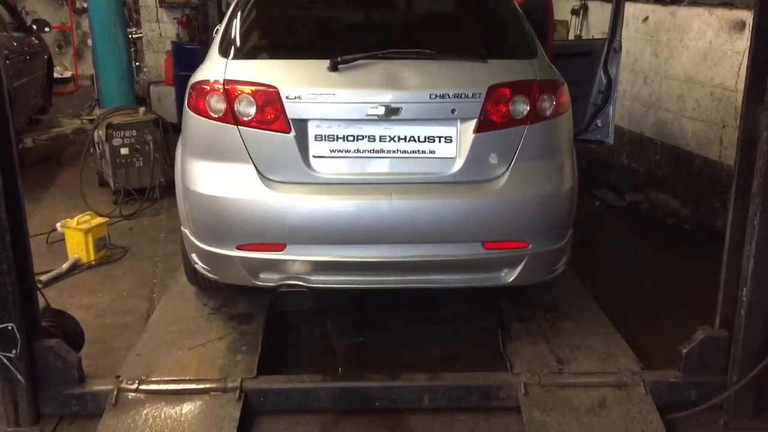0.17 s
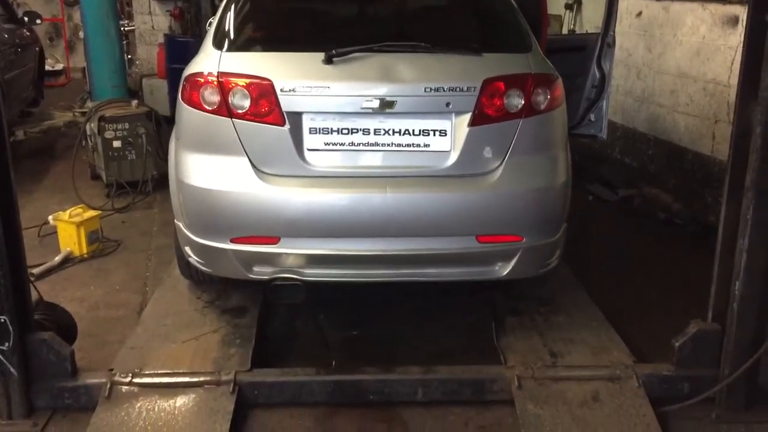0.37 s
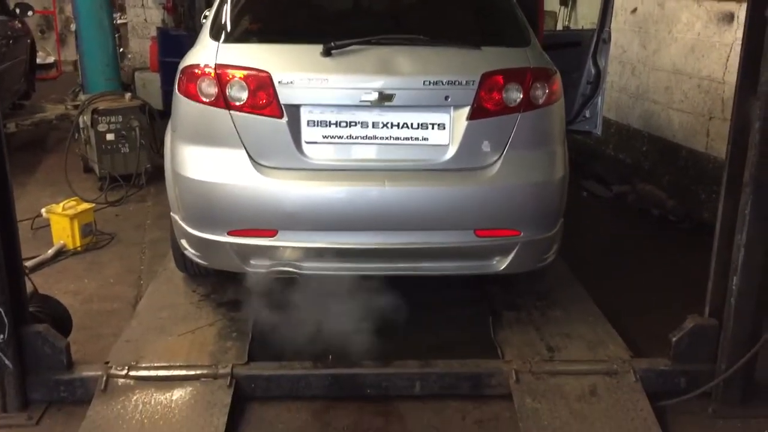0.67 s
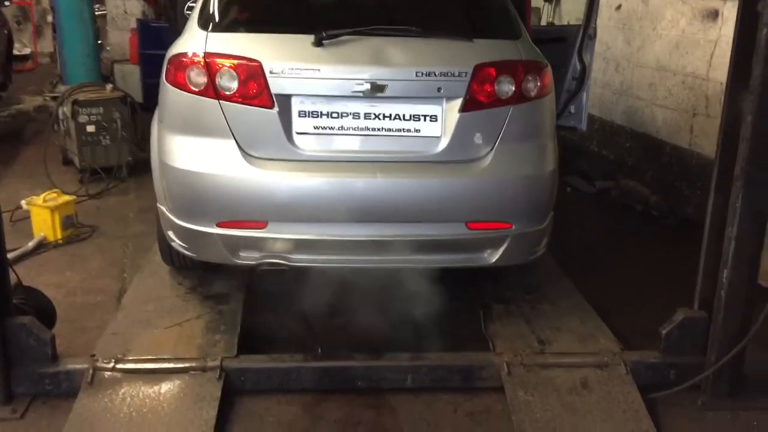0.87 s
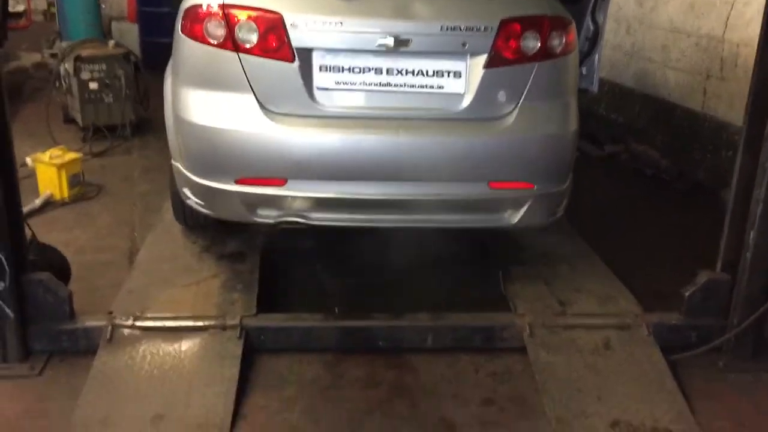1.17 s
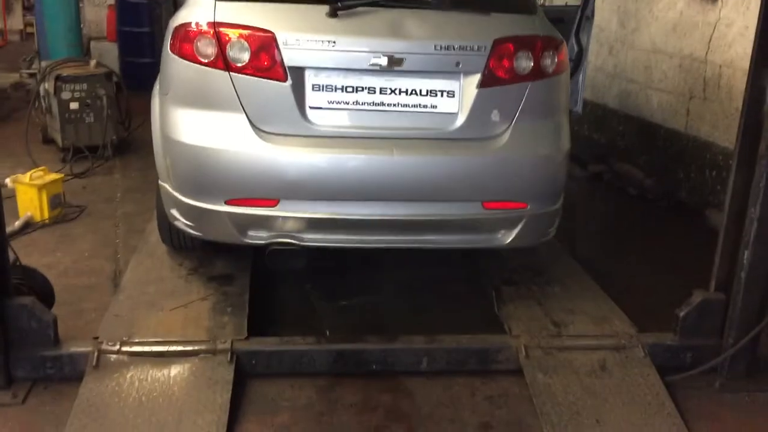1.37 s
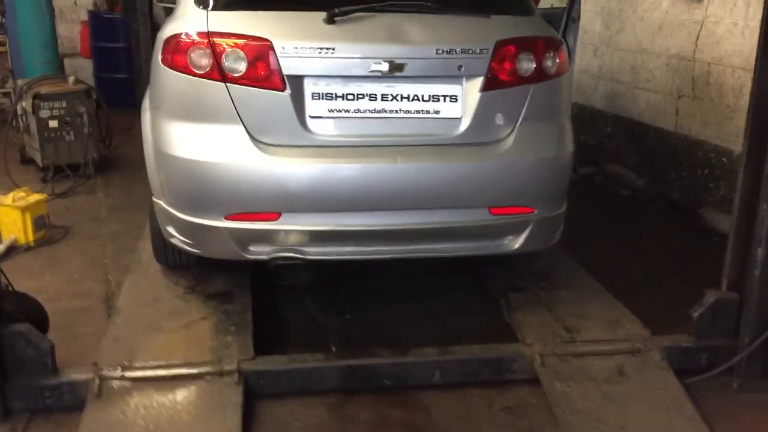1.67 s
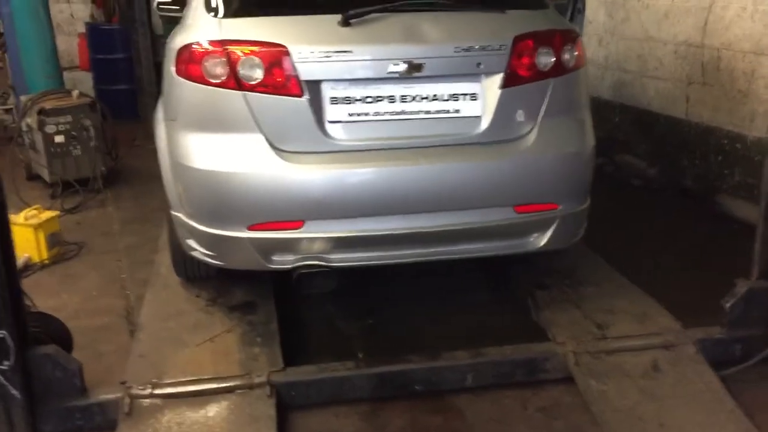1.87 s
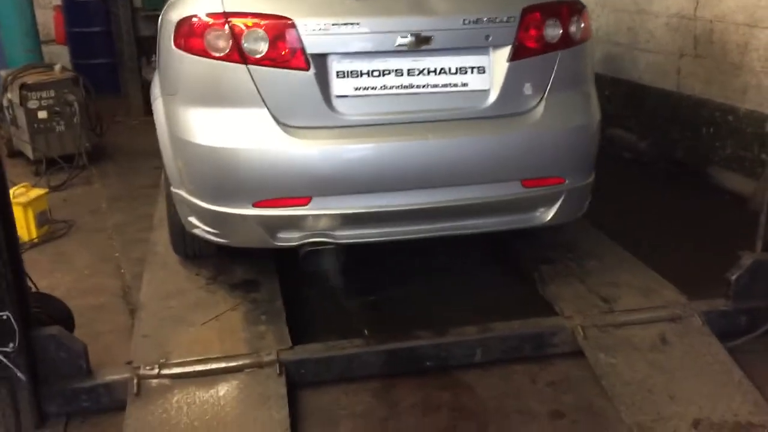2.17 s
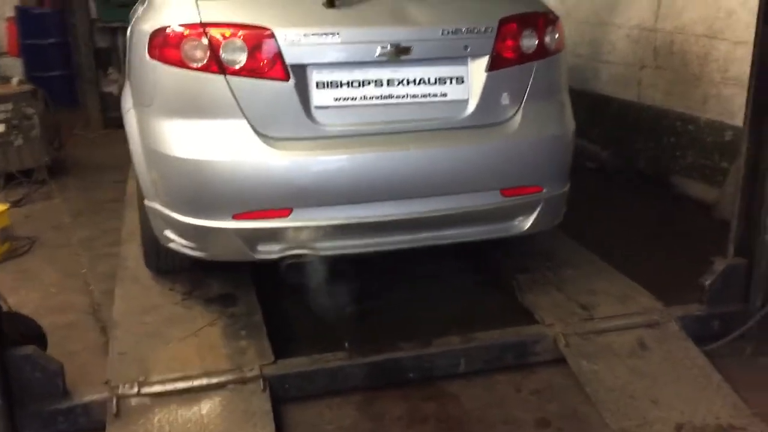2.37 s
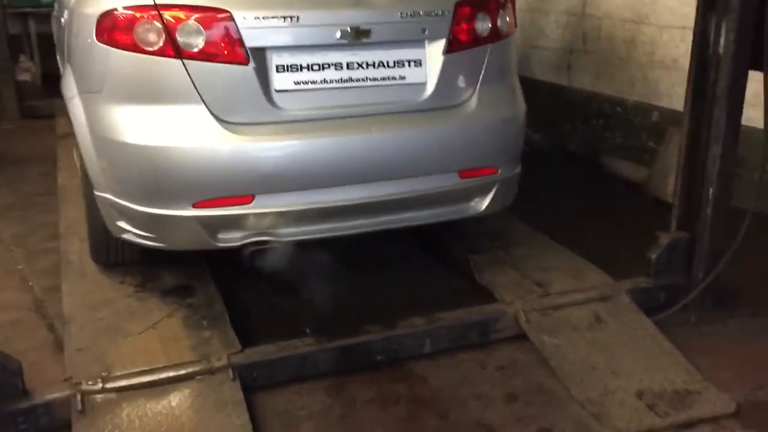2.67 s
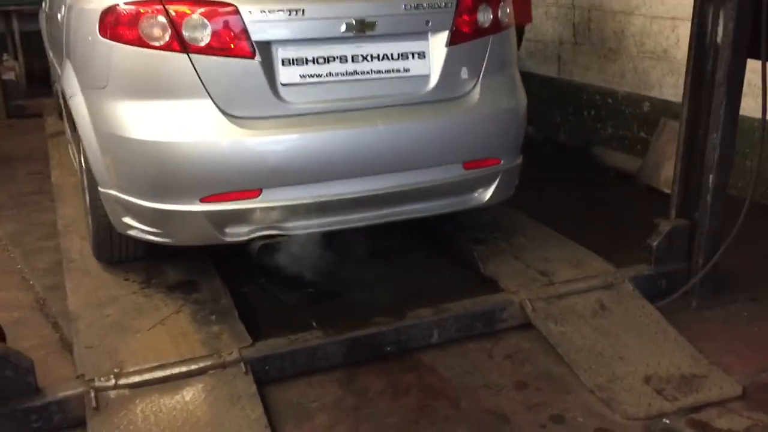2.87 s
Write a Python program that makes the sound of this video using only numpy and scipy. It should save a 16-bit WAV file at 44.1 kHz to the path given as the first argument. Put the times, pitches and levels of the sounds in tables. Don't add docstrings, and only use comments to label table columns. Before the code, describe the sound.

A four-cylinder car exhaust, heard close behind the tailpipe in a workshop, starts as a humming drone sliding down and wavering in loudness. Around 0.6 s a short throttle blip rasps with a gassy roar; a longer, stronger one follows at 1.1-1.4 s, raising the pitch. At 1.42 s one abrupt pop marks a cut, then the drone sinks steadily, duller and deeper, until 3 s. Short room echo.

```python
import sys
import numpy as np
from scipy import signal
from scipy.fft import rfft, irfft, next_fast_len
from scipy.io import wavfile
from scipy.ndimage import uniform_filter1d, map_coordinates

SR = 44100
rng = np.random.default_rng(int(sys.argv[2]) if len(sys.argv) > 2 else 0)


def invert_db(level):
    return 10 ** (np.asarray(level, dtype=float) / 20)


def waveform_to_disk(signal):
    frames = np.transpose(np.atleast_2d(signal))
    scaled = np.clip(frames, -1, 1) * 32767
    samples = np.round(scaled).astype(np.int16)
    wavfile.write(sys.argv[1], SR, samples)


N = 133182


def unit(x):
    return x / np.sqrt(np.mean(x ** 2) + 1e-20)


def along(points, hz):
    f, value = np.transpose(points)
    return np.interp(np.log(hz + 1), np.log(f + 1), value)


def curve(rows):
    t, value = np.transpose(rows)
    straight = np.interp(np.arange(N) / SR, t, value)
    return uniform_filter1d(straight, size=900, mode="nearest")


def wobble(rate):
    knots = rng.standard_normal(int(N * rate / SR) + 4)
    return map_coordinates(knots, [np.arange(N) * rate / SR])


def filtered(x, response):
    m = next_fast_len(len(x) + SR // 2)
    return irfft(rfft(x, m) * response(np.fft.rfftfreq(m, 1 / SR)), m)[:len(x)]


def ring(modes, f):
    return sum(sign * invert_db(db) * 1j * f * width / (center * center - f * f + 1j * f * width)
               for center, width, db, sign in modes)


def dip(hz, width, f):
    return ring([(hz, width, 0, 1)], f)


def noise(spectrum):
    return unit(filtered(rng.standard_normal(N), lambda hz: invert_db(along(spectrum, hz))))


# t/s, firing rate f/Hz
SPEED = [(0, 179.6), (.19, 169.2), (.38, 159.3), (.51, 154.7), (.56, 155.8), (.66, 161.7), (.8, 164.2),
         (.9, 162.9), (1.07, 157.3), (1.13, 160), (1.25, 174.1), (1.31, 179), (1.4, 180.1), (1.45, 179.9),
         (1.73, 165.7), (2.09, 146.8), (2.49, 128.6), (3.02, 105.3)]


def firing_rate():
    return curve(SPEED)


# t/s, load [0-1]
BLIPS = [
    [(.535, 0), (.57, 0.11), (.622, 1), (.66, 0.77), (.705, 0.45), (.78, 0)],
    [(1.075, 0.06), (1.105, 0.16), (1.155, 1), (1.25, 0.84), (1.33, 0.3), (1.41, 0.01)],
]


def throttle_load():
    return sum(curve(blip) for blip in BLIPS)


# multiple, coasting level/dB, added under load level/dB
WHOLE = [(1, -11, 0), (2, -11, -13), (3, -17, 18), (4, -18.5, 16.5), (5, -25.5, 19.5), (6, -18, -7)]
# multiple, coasting level/dB, added under load level/dB
HALF = [(0.51, -37, 8), (.75, -52, 3), (1.25, -36.5, 1.5), (1.75, -42, 3.5), (1.5, -17.5, 0),
        (2.5, -26.5, 17), (2.6, -54.5, 9), (4.5, -31.5, 2.2), (5.5, -30, 18)]
# multiple, coasting level/dB, added under load level/dB
WHINE = [(6.5, -39, 3), (7, -32, 3), (7.5, -31, -6), (8, -44, 9), (8.5, -46, 3)]
# f/Hz, width f/Hz, level/dB, sign and size [1]
PIPE = [(105.2, 15, -16, 0.65), (115, 27, -33, -1.16), (135.8, 10, -7, -0.79), (145.2, 4.72, 3, -1.28),
        (163.4, 12.35, 2.65, 1), (182.4, 20.9, -1, -1.104), (219.04, 9.85, 4.5, 0.8),
        (254.33, 13.5, -7, -0.96), (314.5, 5.04, -1, 0.97), (377.8, 12.9, -13.5, -1.1),
        (450.5, 9.4, -14, 0.93), (622.3, 17.2, -10, -0.89), (675.2, 17, -9, 0.42), (783, 26.4, -7.5, -0.64)]
# f/Hz, width f/Hz, level/dB, sign and size [1]
BRANCH = [(86, 120, -1, 0.49), (150, 39, -13, -1.7), (201.3, 14, 3.5, -0.61), (221, 14, -12.5, 1),
          (259, 18.4, -2.5, 0.91), (320, 5.7, 1, -1.41), (388, 10, -24.5, 0.9), (604, 23.3, -7.5, -1.66),
          (697, 67, -5.5, 1), (846, 150, 4, 0.023)]
# f/Hz, width f/Hz, level/dB, sign [1]
PANELS = [(700, 50, -3, 1), (778, 36, .5, -1), (1300, 40, .5, 1), (1432, 26, 6, -1)]
# f/Hz, width f/Hz
NOTCHES = [(139, 7), (116.5, 9), (325, 11)]
# t/s, pressure [+1 pumping, -1 firing]
PRESSURE = [(0, 1.286), (.44, 0.75), (.555, 0.38), (.6, -0.79), (.66, -0.97), (.7, -1.32), (.737, 0.37),
            (.79, 0.91), (1.03, 1.22), (1.093, -0.021), (1.14, -0.73), (1.205, -1.43), (1.27, -0.92),
            (1.325, -.1), (1.385, 0.21), (1.425, 1), (3.02, 1.064)]


def drone(hz, firings, load):
    out = np.zeros(N)
    pressure = curve(PRESSURE)
    for orders, modes in ((WHOLE, PIPE), (HALF, BRANCH), (WHINE, PANELS)):
        for k, db, load_db in orders:
            f = k * hz
            flutter = invert_db(.75 * min(k, 5) * wobble(13))
            drift = np.exp(.11j * k * wobble(30) + 1j * rng.uniform(0, 2 * np.pi))
            gain = ring(modes, f) * invert_db(db + load_db * np.sqrt(np.abs(load)))
            for center, width in NOTCHES:
                gain = gain * (1 - 0.78 * dip(center, width, f))
            leak = .14 if k == 1 else .6
            turn = 1 if modes is PANELS else pressure + 1j * leak
            out += np.real(gain * turn * flutter * drift * np.exp(2j * np.pi * k * firings))
    return out


CYLINDERS_DB = [.3, -8, -1, -9]
# f/Hz, width f/Hz, level/dB, sign and size [1]
SHELL = [(666, 54, 5, 1), (848, 140, -2.5, -2.07), (1150, 94, -1, 0.98), (1333, 70, -1, -1.78),
         (1822, 123, 4.5, 0.79), (2024, 145, 0, -0.61), (3136, 87, -9.5, 0.85), (3514, 178, -11, -0.55),
         (6540, 350, -23.5, 0.84)]
# t/s, half length t/s, level/dB
RASPS = [(.475, .045, 11), (.58, .03, 5), (1.0, .06, 7), (1.125, .04, 8), (1.96, .06, 13)]


def edges(hz, firings, load):
    level_db, load_db, scatter_db = -40, 16.5, 2.5
    whole = np.arange(1, int(firings[-1]))
    luck = rng.standard_normal((len(whole), 2))
    at = np.interp(whole + 0.0045 * luck[:, 0], firings, np.arange(N))
    size = invert_db(np.take(CYLINDERS_DB, whole % 4) + scatter_db * luck[:, 1])
    i = at.astype(int)
    early = np.bincount(i, size * (1 + i - at), N + 1)
    late = np.bincount(i + 1, size * (at - i), N + 1)
    train = (early + late)[:N]

    def shell(f):
        return ring(SHELL, f) * (1j * f / (500 + 1j * f)) ** 2

    t = np.arange(N) / SR
    rasp_db = sum(db * np.exp(-((t - s) / half) ** 2) for s, half, db in RASPS)
    speed_db = 5 * np.log2(hz / 165)
    gain = invert_db(level_db + load_db * np.sqrt(np.abs(load)) + rasp_db + speed_db)
    return filtered(train * gain, shell) / np.sqrt(np.mean(filtered(train, shell) ** 2))


def puffing(firings, share):
    puff = np.exp(-3.5 * (firings % 1)) * invert_db(np.take(CYLINDERS_DB, firings.astype(int) % 4))
    return unit(1 - share + share * unit(puff))


# f/Hz, level/dB per Hz
HUM = [(240, -42), (400, -11), (560, -15.5), (740, -3), (990, -14), (1300, -10.5), (2850, -19),
       (15500, -47.5)]


def hum(hz, firings, load):
    speed_db = 10.5 * np.log2(hz / 165)
    lull_db = 5 * np.exp(-(curve(PRESSURE) / .5) ** 2) * (load < .1)
    gain = invert_db(-33.5 + speed_db + 1.2 * wobble(17) - lull_db)
    return gain * puffing(firings, .1) * noise(HUM)


# f/Hz, level/dB per Hz
RUMBLE = [(20, -120), (40, -13.5), (100, -11.5), (220, 10.5), (350, 1.5), (600, -27.5), (900, -120)]


def rumble():
    return invert_db(-32.5 + 1.5 * wobble(6.96)) * noise(RUMBLE)


# f/Hz, time to fall by 60 dB t/s
SHOP = [(300, 1), (2000, 0.15), (10000, 0.27)]


def shop(x):
    hz, t, z = signal.stft(rng.standard_normal(SR // 2), SR, nperseg=256)
    fading = invert_db(-60 * t / along(SHOP, hz)[:, None])
    tail = signal.istft(z * fading, SR, nperseg=256)[1]
    delayed = np.pad(x, (500, 0))
    return invert_db(-6) * signal.fftconvolve(delayed, tail / np.linalg.norm(tail))[:N]


# f/Hz, level/dB per Hz
ROAR = [(500, -120), (900, -24.5), (1900, 0.5), (2750, -14.5), (3500, -9), (4800, -16), (6400, -16),
        (15500, -40)]


def roar(firings, load):
    return invert_db(-24.5) * np.abs(load) ** 1.76 * puffing(firings, .5) * noise(ROAR)


def click():
    start_s, level_db, fade_s = 1.4233, -5.5, .0015
    t = np.arange(N) / SR - start_s
    step = -invert_db(level_db) * (t >= 0) * np.exp(-np.abs(t) / fade_s)
    return filtered(step, lambda f: (1j * f / (110 + 1j * f)) ** 2)


# t/s, level/dB
CAR_LEVEL = [(0, -0.5), (.2, -1.5), (.45, 0.74), (1.0, -0.63), (1.6, 0.76), (2.3, -1.1), (3.02, -0.13)]


def scene():
    hz = firing_rate()
    load = throttle_load()
    firings = np.cumsum(hz) / SR
    bright = edges(hz, firings, load) + hum(hz, firings, load) + roar(firings, load)
    bright = filtered(bright, lambda f: 1 - .7 * dip(2850, 350, f))
    car = drone(hz, firings, load) + rumble() + bright + shop(bright)
    car = filtered(invert_db(curve(CAR_LEVEL)) * car, lambda f: f < 15400)
    return (car + click())[None]


def low_pass(x):
    return signal.sosfilt(signal.butter(12, 16510, fs=SR, output="sos"), x)


def record(dry):
    mix = filtered(dry[0], lambda hz: hz < 16500)[None]
    return low_pass(mix)


dry = scene()
out = record(dry)
waveform_to_disk(out)
```